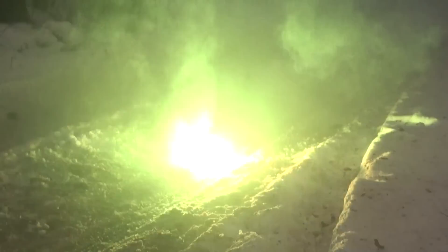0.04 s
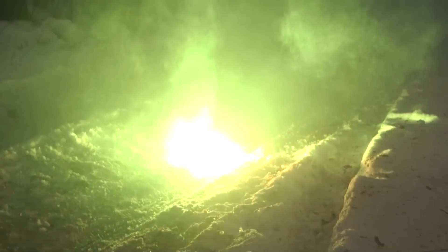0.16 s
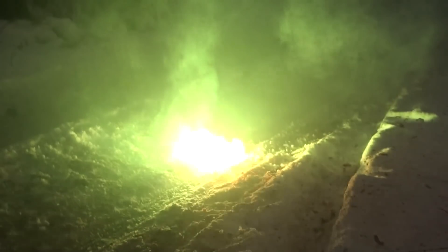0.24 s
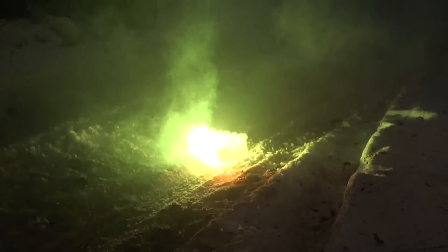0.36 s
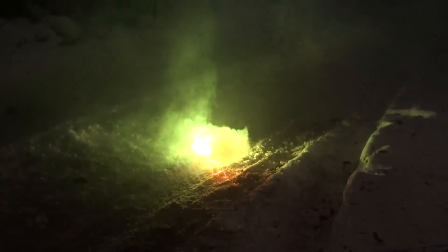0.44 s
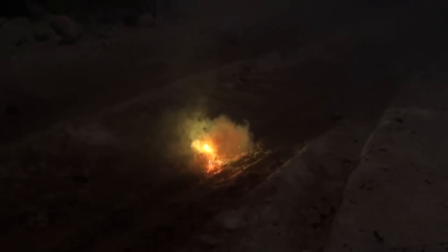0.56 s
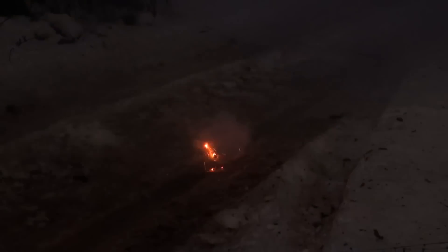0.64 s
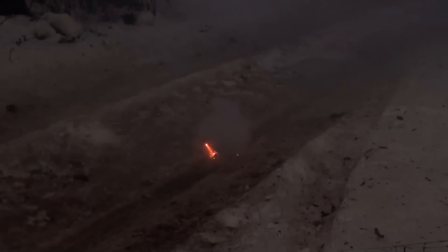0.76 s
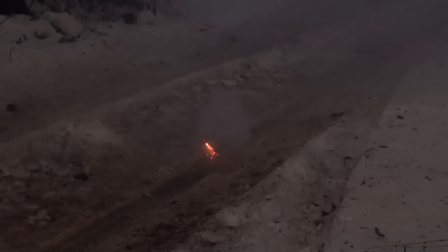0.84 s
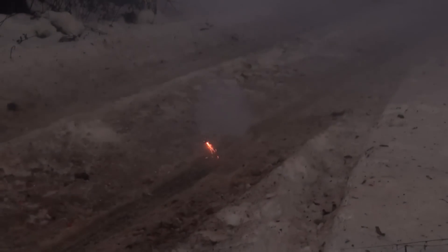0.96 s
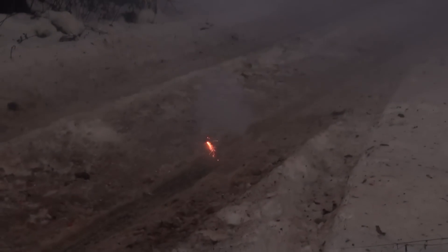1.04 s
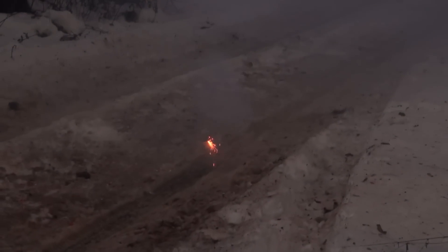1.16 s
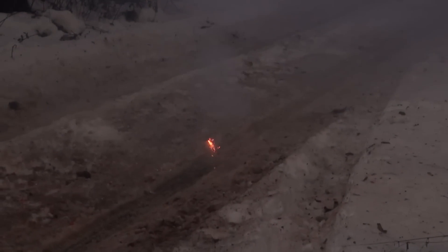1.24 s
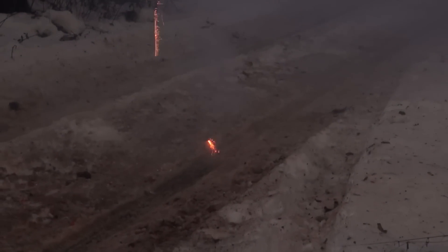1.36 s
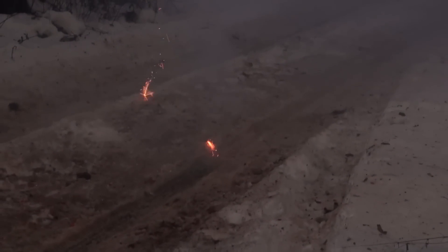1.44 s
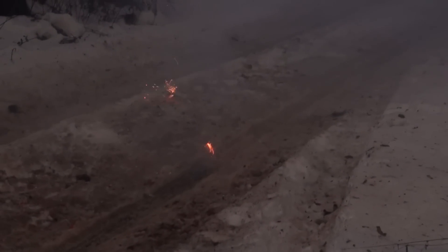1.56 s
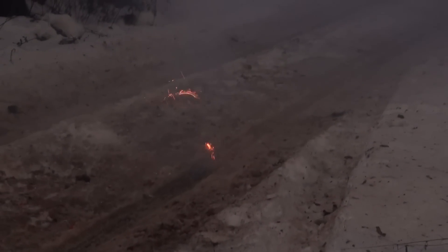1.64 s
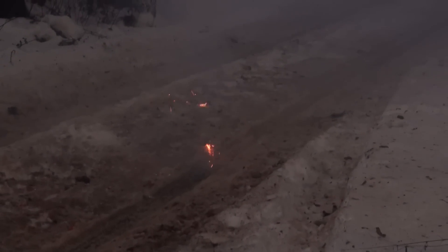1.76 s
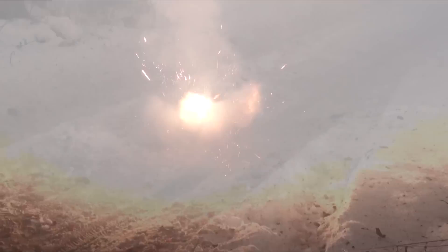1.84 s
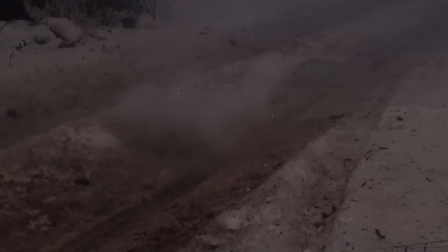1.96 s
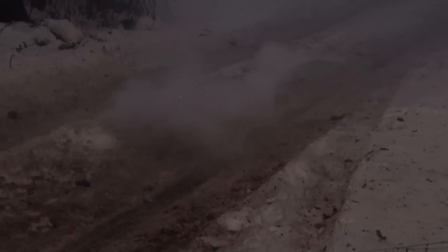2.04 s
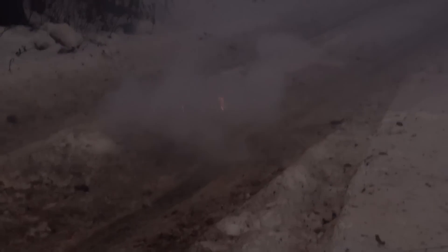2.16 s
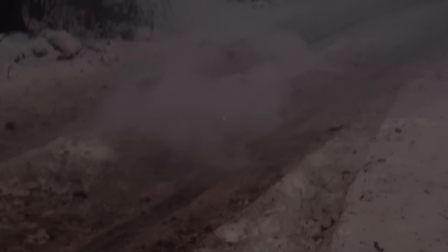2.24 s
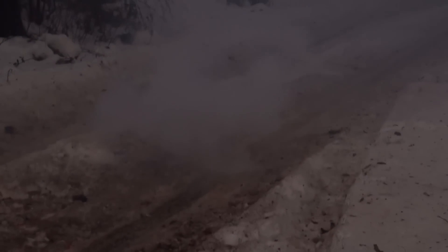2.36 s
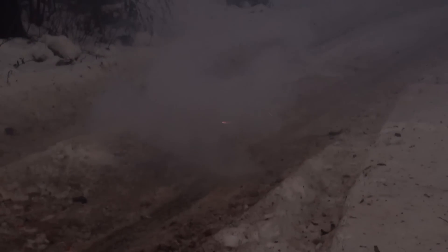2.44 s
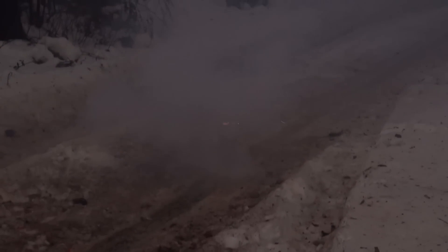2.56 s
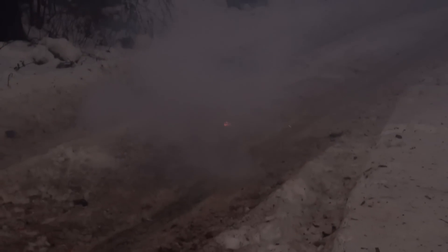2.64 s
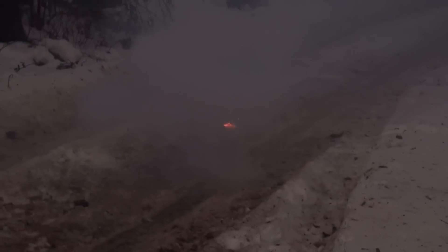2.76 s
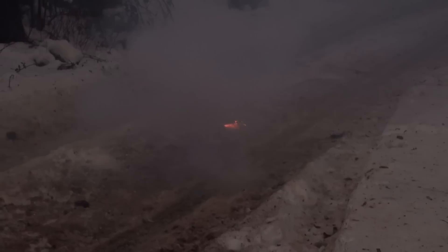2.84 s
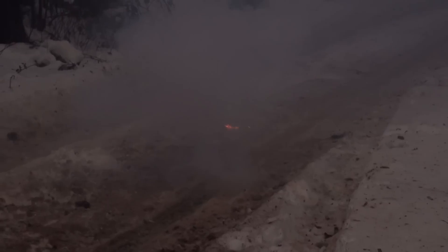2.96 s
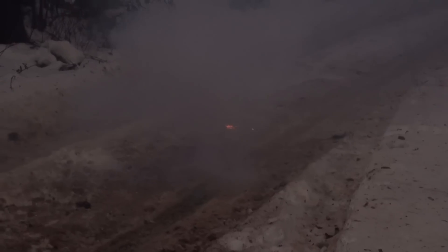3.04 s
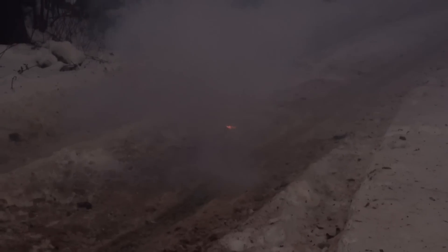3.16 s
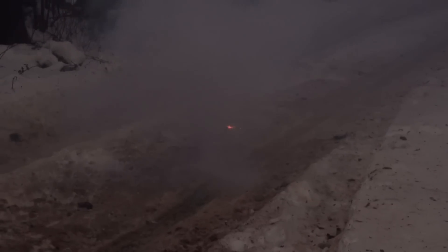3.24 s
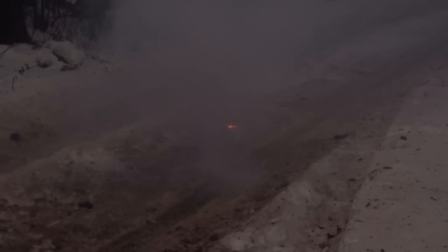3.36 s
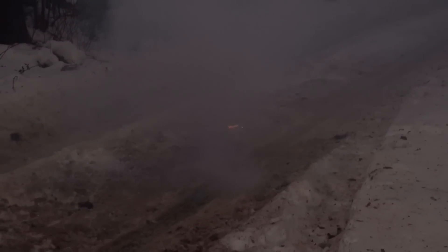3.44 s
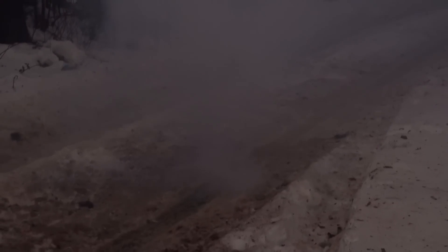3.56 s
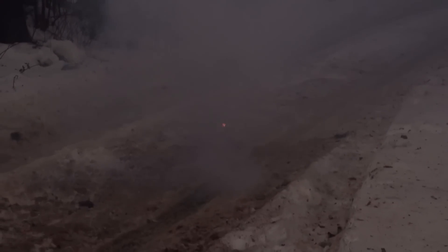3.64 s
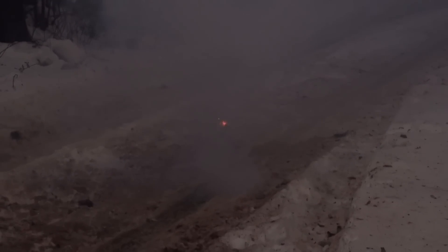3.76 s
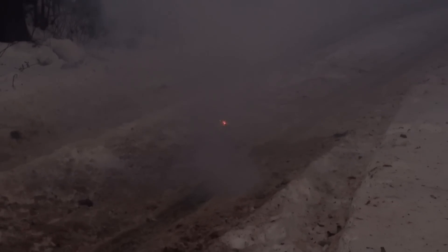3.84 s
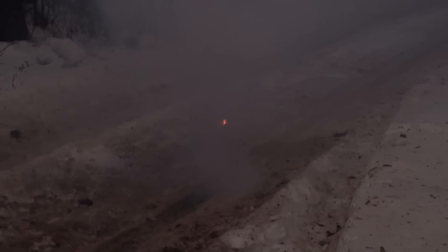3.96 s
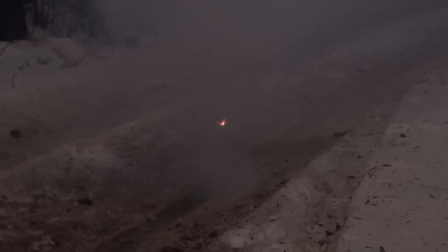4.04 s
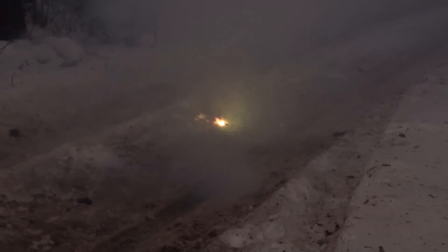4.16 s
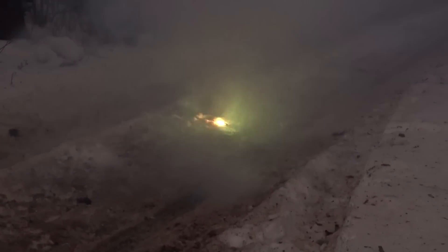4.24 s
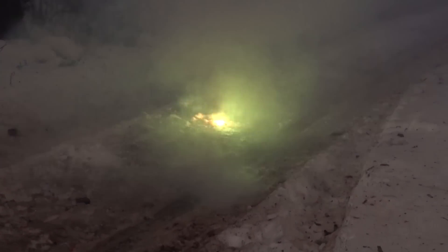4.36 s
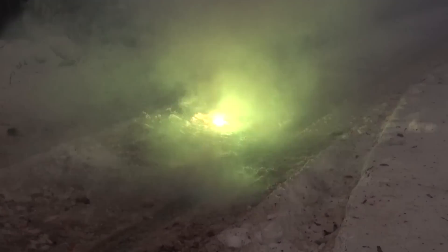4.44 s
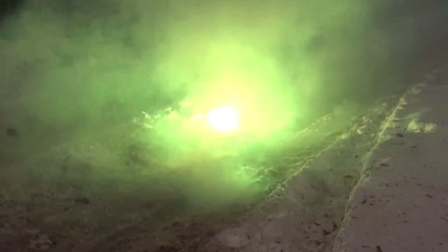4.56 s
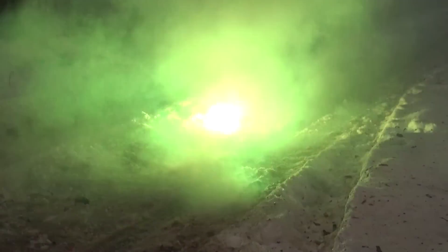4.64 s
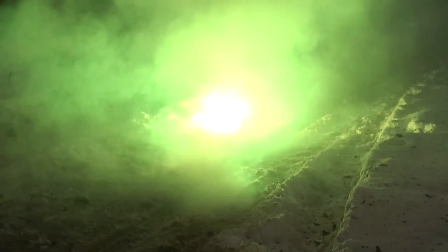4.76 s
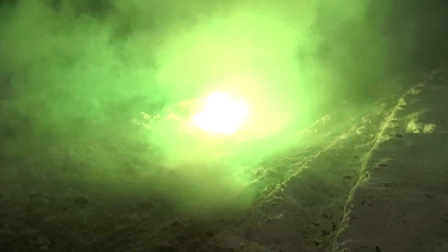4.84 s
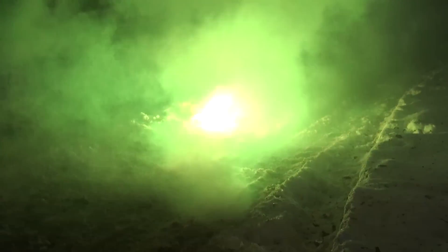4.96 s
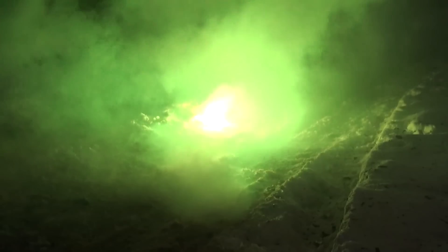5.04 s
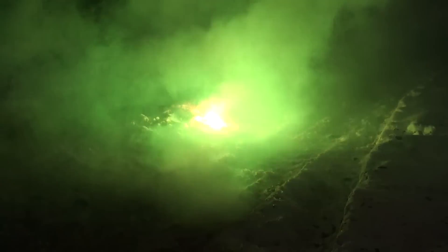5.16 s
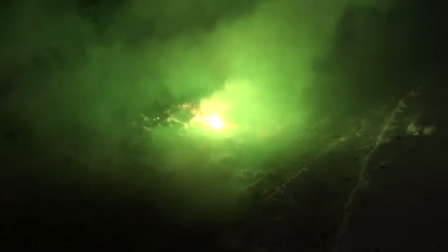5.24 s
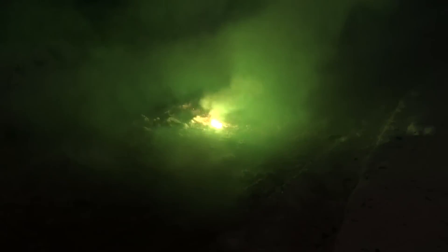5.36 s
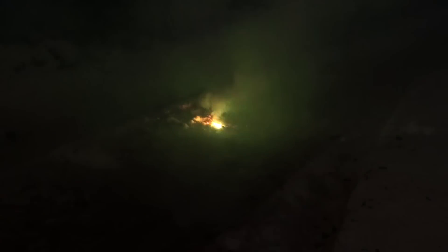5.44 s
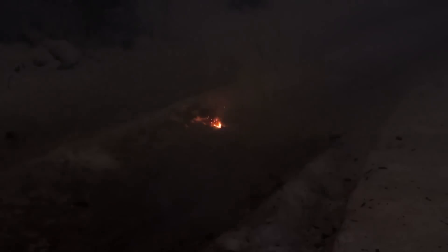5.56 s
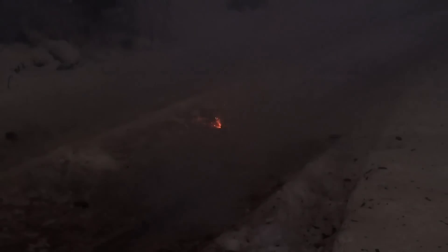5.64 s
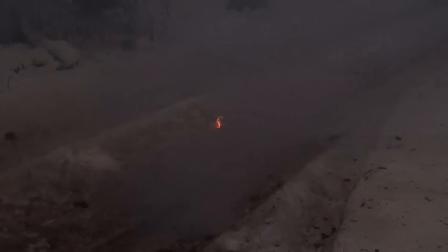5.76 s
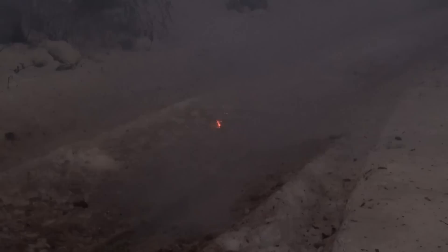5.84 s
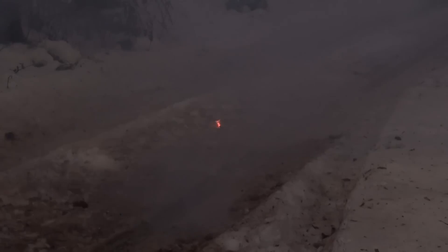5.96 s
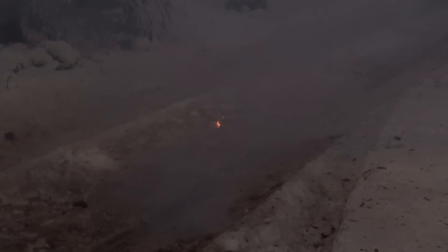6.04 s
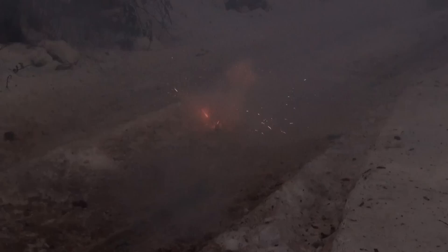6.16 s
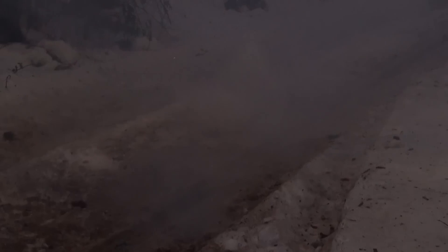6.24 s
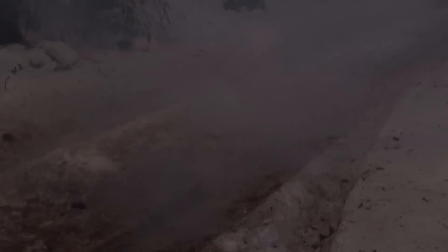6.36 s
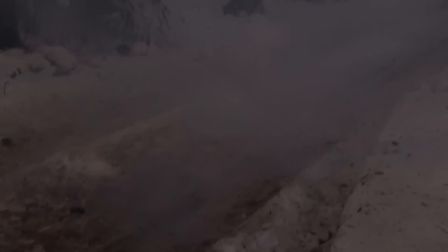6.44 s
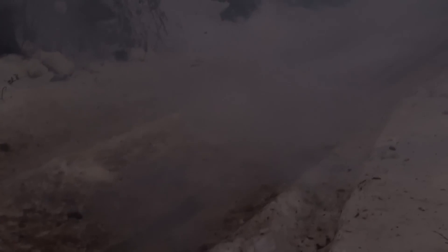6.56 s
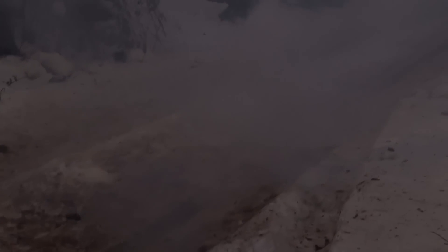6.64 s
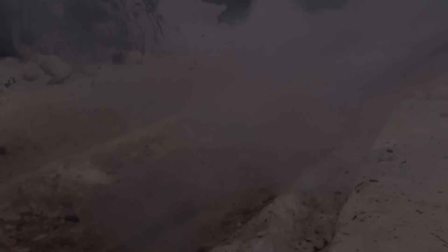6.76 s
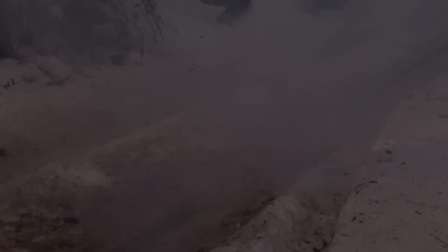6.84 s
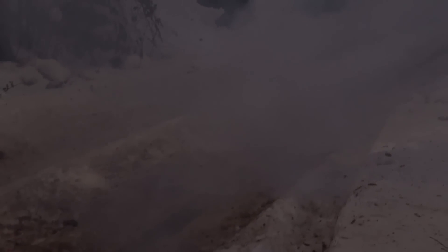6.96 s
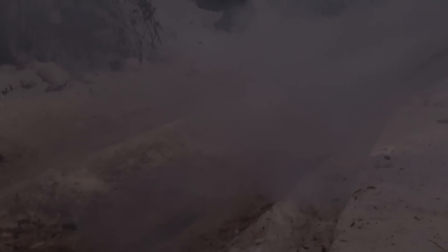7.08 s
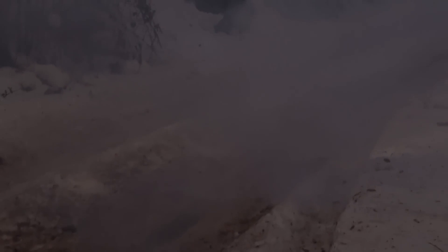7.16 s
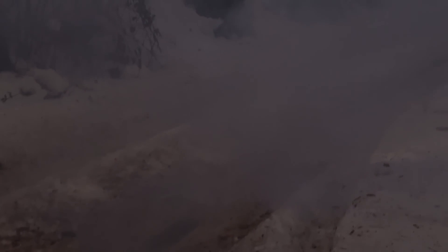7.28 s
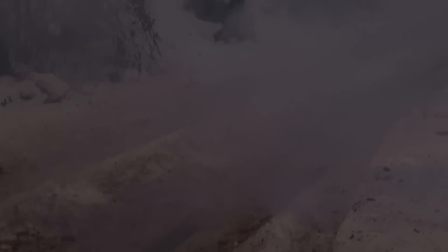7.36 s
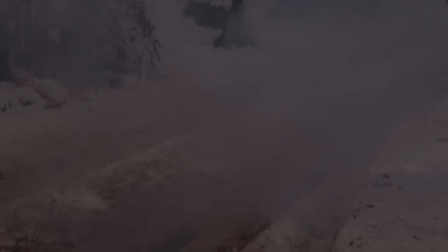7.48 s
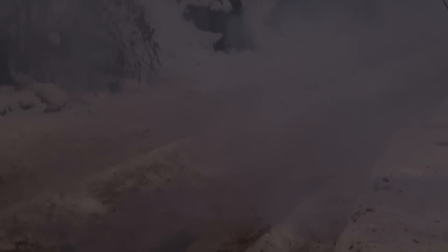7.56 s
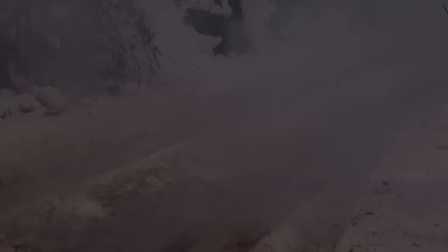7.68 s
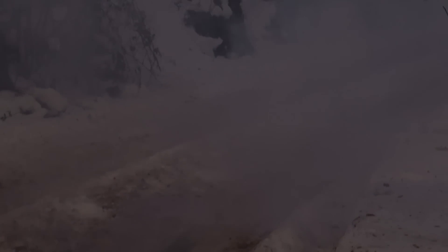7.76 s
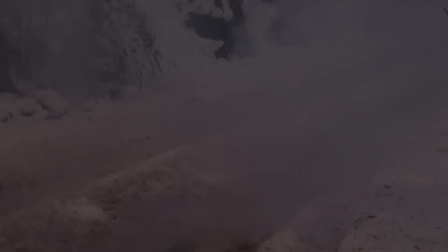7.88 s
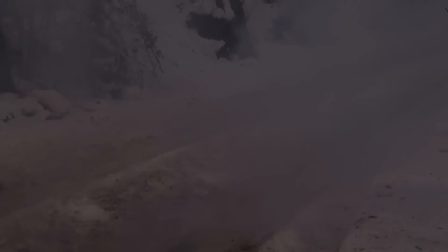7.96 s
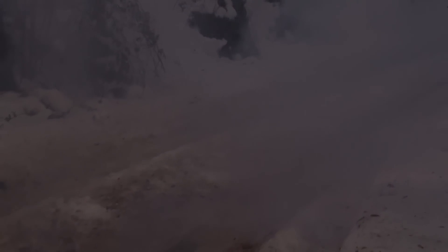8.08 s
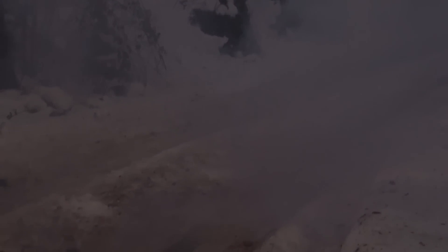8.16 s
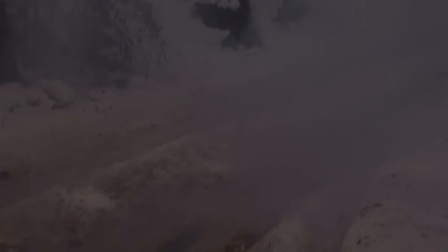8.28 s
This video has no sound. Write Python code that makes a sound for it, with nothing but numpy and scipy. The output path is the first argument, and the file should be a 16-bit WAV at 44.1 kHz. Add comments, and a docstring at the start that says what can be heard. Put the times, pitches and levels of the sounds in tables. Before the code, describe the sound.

At 0 s a faint hiss quickly swells into a bright, fierce sizzle with a rushing plume and low fluttering flame, strongest around 0.2-0.6 s. It weakens to an uneven sputter with gas spurts near 0.95 and 1.2 s; a spark tick and dull far thuds come at 1.5-1.9 s. At 1.93 s a close, overloaded bang hits: sharp crack, deep boom, slaps until about 2.6 s, and a roll growing duller. Faint fuse fizz and tiny ticks remain around 2.3-3.9 s, with soft thuds near 3.8 and 4.1 s. From about 4.2 s a quieter rushing, fluttering flare swells, peaks near 4.9-5.3 s and fades to weak hiss. At 6.23 s a second bang arrives, slightly slower in onset, with slaps to 6.6 s and a long echo. Low rumble and microphone hiss remain, with muffled distant pops around 8.0-8.2 s. Sound leans right throughout.

```python
"""Two firecrackers on a snowy street at night: each hisses and flutters as a green flare, then bursts.
Flares and fuse are coloured noise grains under burn envelopes; each burst is a pressure wave and a crack.
The blast rolls back from houses and trees as grains, swells and slaps, duller the further it has come.
Far thuds, mostly other fireworks, are single swings with soft tails, over a low rumble of noise.
The stereo microphone hisses, its left port is weaker, and the blasts overload the recorder."""
import sys
import numpy as np
from scipy import signal
from scipy.fft import rfft, irfft, next_fast_len
from scipy.io import wavfile
from scipy.ndimage import uniform_filter1d

SR = 44100
rng = np.random.default_rng(int(sys.argv[2]) if len(sys.argv) > 2 else 0)


def to_wav(s):
    """Save 16-bit WAV."""
    ch = np.atleast_2d(s).T  # columns
    pcm = np.round(np.clip(ch, -1, 1) * 32767)  # PCM
    wavfile.write(sys.argv[1], SR, pcm.astype(np.int16))


N = 366559
TIME = np.arange(N) / SR


def undb(db):
    """Decibels to amplitude gain."""
    return np.exp(np.asarray(db) * np.log(10) / 20)


def curve(rows):
    """The second column of a table, joined by straight lines in time."""
    t, values = np.array(rows).T
    return np.interp(TIME, t, values)


def during(rows, fade):
    """One inside the time span of a table, fading to zero over fade seconds outside it."""
    inside = np.minimum(TIME - rows[0][0], rows[-1][0] - TIME)
    return np.clip(1 + inside / fade, 0, 1)


def pan(db):
    """Left and right gains that average 1; a negative level difference leans to the right."""
    half_db = np.atleast_1d(db) / 2
    gains = np.array([undb(half_db), undb(-half_db)])
    return gains / gains.mean(axis=0)


def walk(rate):
    """Slow chance: random levels held 1 / rate s, then smoothed twice."""
    hold = max(int(SR / rate), 1)
    steps = np.repeat(rng.standard_normal(N // hold + 1), hold)
    slewed = uniform_filter1d(steps, hold)
    return uniform_filter1d(slewed, hold)[:N]


def grains(count, spread_db, likeness):
    """About count pulses a second, of uneven size, at two ports; a share of their power is common."""
    total = count * N // SR
    sizes = rng.standard_normal((3, total)) * undb(spread_db * rng.standard_normal((3, total)))
    pulses = np.array([np.bincount(rng.integers(0, N, total), row, N) for row in sizes])
    common, separate = pulses[2], pulses[:2]
    return np.sqrt(likeness) * common + np.sqrt(1 - likeness) * separate


def colour(x, points):
    """Filter a stereo sound to a spectrum; the mean of its two ports has rms 1."""
    size = next_fast_len(N, True)
    hz, db = np.transpose(points)
    log_hz = np.log(np.arange(size // 2 + 1) * SR / size + 1)  # 1 Hz added to avoid log(0)
    gain = undb(np.interp(log_hz, np.log(hz), db))
    y = irfft(rfft(x, size) * gain, size)[:, :N]
    return y / y.mean(axis=0).std()


def add(out, s, sound):
    """Mix a sound in from time s."""
    start = int(s * SR)
    out[:, start:start + sound.shape[-1]] += sound[..., :N - start]


def burn(s, rise, hold, fall, db):
    """Attack up to time s, hold, release; rise and fall are the times for 20 dB."""
    before = np.maximum(s - TIME, 0)
    after = np.maximum(TIME - s - hold, 0)
    return undb(db - 20 * (before / rise + after / fall))


def puff(age, build_up):
    """A swell that peaks at 1 after its build-up time and dies away more slowly."""
    u = np.maximum(age, 0) / build_up
    return u * np.exp(1 - u)


def together(envelopes):
    """Unrelated sounds add in power."""
    return np.sqrt(sum(e ** 2 for e in envelopes))


def pressure_wave(hz, cycles):
    """A push and a suction that swing out within a few cycles; peak 1."""
    turns = hz * TIME[:SR // 8]
    wave = np.sin(2 * np.pi * turns) * turns * np.exp(-turns / cycles)
    return wave / np.abs(wave).max()


# noise spectrum of the microphone: f/Hz, relative level per Hz/dB
HISS_SPECTRUM = [(100, -3), (2000, 8.5), (5000, -6.5), (7500, -7.5), (10000, -8.5), (11500, -13.5),
                 (14000, -21.5)]


def microphone_hiss():
    """Faint steady noise of the microphone, independent at its two ports."""
    return colour(rng.standard_normal((2, N)), HISS_SPECTRUM) * undb(-64)


# spectrum of the low rumble: f/Hz, relative level per Hz/dB
RUMBLE_SPECTRUM = [(25, -4), (60, -2.5), (120, -6), (240, -0.5), (480, -5.5), (900, -10), (1600, -16.5),
                   (3000, -40), (6000, -45), (14000, -57)]
# its two broad swells, the second probably the flare's plume:
# full at t/s, rise for 20 dB/s, hold/s, fall for 20 dB/s, level/dB
RUMBLE_SWELLS = [(1.4, 0.67, .42, .25, -48), (4.38, 0.93, 0.68, 1.9, -47)]


def low_rumble():
    """Low, irregular noise of the far town with two broad swells, the second probably the flare's plume."""
    steady = undb(-53)
    swells = together([steady] + [burn(*swell) for swell in RUMBLE_SWELLS])
    rumble = colour(grains(count=3000, spread_db=3.0, likeness=0.44), RUMBLE_SPECTRUM)
    return rumble * swells * undb(walk(12)) * pan(-11.5)


# spectrum of the hot plume: f/Hz, relative level per Hz/dB
PLUME_SPECTRUM = [(100, -17), (250, -13), (430, -2.5), (700, -9.5), (1200, -15.5), (2200, -18.5),
                  (3500, -28), (8000, -46.5)]
# hot plumes of the two flares: fully alight at t/s, rise for 20 dB/s, hold/s, fall for 20 dB/s, level/dB
PLUME_BURNS = [(0.132, 0.28, 0.12, 0.76, -37.5), (4.85, 0.64, 0.24, 1, -46)]
# spectrum of the low flame: f/Hz, relative level per Hz/dB
FLAME_SPECTRUM = [(25, -29.5), (55, -16), (85, 2.5), (110, -3), (160, -7.5), (300, -13.5), (800, -32),
                  (4000, -65.5)]
# low flames of the two flares: fully alight at t/s, rise for 20 dB/s, hold/s, fall for 20 dB/s, level/dB
FLAME_BURNS = [(0.128, .2, 0.25, 0.59, -41), (4.847, 0.25, 0.29, 0.71, -44.5)]
# spectra of the two gas jets, one list each: f/Hz, relative level per Hz/dB
JET_SPECTRA = [
    [(400, -17.5), (900, -9), (1500, -5.5), (3000, -4), (4800, -1), (6900, -4), (8600, 0), (9700, -7),
     (11400, -15.5), (13400, -21), (14000, -27.5)],
    [(400, -8.5), (1100, -8), (1650, -11), (2400, -5), (3600, -8.5), (5100, -8), (6200, -12), (8000, -9),
     (10000, -16.5), (11500, -22.5), (13200, -23.5), (14000, -32)],
]
# the two gas jets: full force at t/s, rise for 20 dB/s, hold/s, fall for 20 dB/s, level/dB
JET_BURNS = [(0.27, 0.22, 0.29, 0.2, -35), (4.93, 1.17, 0.47, 0.77, -47)]
# each spent flare hissing on until its burst: t/s, level/dB, fading/(dB per s)
AFTERBURNS = [(.73, -40, 5.5), (5.9, -51.5, 0.5)]
# a brief swell at the very start, then spurts of gas as the powder burns unevenly: t/s, build-up/s, level/dB
START_AND_SPURTS = [(0, 0.02, -50.5), (.155, .03, -40), (.242, 0.012, -33.5), (.385, 0.012, -35.5),
                    (.945, .025, -44), (1.18, 0.03, -40.5), (1.6, .016, -46)]
# thin top hiss of a fierce jet: f/Hz, relative level per Hz/dB
SEAR_SPECTRUM = [(4000, -29), (8000, -7.5), (10000, 4), (11500, -7), (13400, -5), (14000, -14)]
AFTERBURN_RISE_S = 0.41  # for 20 dB
SEAR_DB, FIERCE_DB = -12.5, -36.5  # top hiss relative to the jet, when the jet's force is FIERCE_DB


def flares():
    """Burning powder: a rushing hot plume, a low fluttering flame and a gas jet that sizzles until the burst."""
    rush = colour(grains(count=6000, spread_db=4.0, likeness=0.59), PLUME_SPECTRUM)
    rush = rush * undb(1.1 * walk(30)) * pan(-11.0)
    roar = colour(grains(count=6000, spread_db=3.0, likeness=0.76), FLAME_SPECTRUM)
    roar = roar * undb(1.6 * walk(22)) * pan(-20.0)
    sear = colour(grains(count=30000, spread_db=2.5, likeness=0.4), SEAR_SPECTRUM)
    sear = sear * undb(SEAR_DB) * pan(-13.0)
    puffs = together(undb(db) * puff(TIME - s, build_up) for s, build_up, db in START_AND_SPURTS)
    out, previous_burst = np.zeros((2, N)), 0
    burns = zip(PLUME_BURNS, FLAME_BURNS, JET_BURNS, AFTERBURNS, JET_SPECTRA, BANGS)
    for plume, flame, jet, (s, db, fading), spectrum, bang in burns:
        afterburn = burn(s, AFTERBURN_RISE_S, 0, 20 / fading, db)
        force = together([burn(*jet), afterburn, puffs])
        # at its fiercest the jet grows brighter and points further to the right
        lean_db = np.interp(force, undb([-42, -34]), [-1.2, -5])
        sizzle = colour(grains(count=30000, spread_db=3.5, likeness=0.55), spectrum) * pan(lean_db)
        sizzle = sizzle + sear * force / undb(FIERCE_DB)
        flutter = undb(0.5 * walk(40) + 1.4 * walk(12))
        sizzle = sizzle * force * flutter
        burst = bang[0]
        alight = (TIME >= previous_burst) & (TIME < burst)
        out += (sizzle + rush * burn(*plume) + roar * burn(*flame)) * alight
        previous_burst = burst
    return out


# far thuds: distant fireworks, and at 3.818 s a late echo of the first burst:
# t/s, peak level/dB, pitch f/Hz, rolling tail level/dB
FAR_THUDS = [(1.469, -32.5, 520, -54), (1.6128, -28.5, 330, -76), (1.617, -28, 800, -67),
             (1.6171, -25, 208, -73), (1.716, -20, 205, -62), (1.920, -15, 262, -39),
             (3.818, -34, 646, -45.5), (4.12, -37, 403, -53), (4.751, -29, 1100, -40.5),
             (5.316, -31.5, 191, -65), (7.972, -40.5, 258, -61), (8.0727, -31.5, 342, -48.5),
             (8.086, -32, 322, -55), (8.162, -34, 380, -71), (8.203, -37.5, 550, -56)]
# spectrum of their rolling tails: f/Hz, relative level per Hz/dB
FAR_ROLL_SPECTRUM = [(40, -12), (250, -3), (650, 5), (1150, 0), (1900, -10.5), (2700, -27), (6000, -34.5)]


def far_thuds():
    """Distant fireworks, and one late echo of the first burst: dull single swings with soft noise tails."""
    out, tails = np.zeros((2, N)), np.zeros((1, N))
    age = TIME[:SR]
    tail = (1 - np.exp(-age / 0.003)) ** 2 * np.exp(-age / 0.06)
    for s, db, hz, tail_db in FAR_THUDS:
        # the swing starts with the suction
        add(out, s, -pan(-16.5) * pressure_wave(hz, cycles=0.37) * undb(db))
        add(tails, s, tail * undb(tail_db))
    roll = colour(grains(count=4000, spread_db=1.0, likeness=0.47), FAR_ROLL_SPECTRUM)
    return out + roll * tails * pan(-11.5)


# fuse smouldering between the bursts: t/s, level/dB
FUSE_LEVEL = [(2.3, -64), (2.8, -66), (3.05, -63), (3.2, -65.5), (3.35, -62), (3.6, -61.5), (3.72, -71),
              (3.9, -63.5)]
# sparks spitting: t/s, level/dB
SPARKS = [(1.57, -31.5), (2.7931, -55), (3.0345, -54), (3.484, -54), (7.063, -55), (7.367, -58.5),
          (7.9657, -56)]


def fuse():
    """The fuse fizzes faintly, and sparks spit with a short bright tick: swells of one grainy hiss."""
    fizz = colour(grains(count=14000, spread_db=4.5, likeness=0.31), JET_SPECTRA[0])
    envelope = np.array([undb(curve(FUSE_LEVEL)) * during(FUSE_LEVEL, fade=0.21)])
    for s, db in SPARKS:
        add(envelope, s, undb(db) * np.exp(-TIME[:SR // 20] / 0.0031))
    return fizz * envelope * pan(-2.1)


# house rows and tree lines that each send back a swell, for both bursts: delay t/s, build-up/s, level/dB
REFLECTORS = [(.15, 0.085, -2), (.305, 0.017, -14.5), (.67, 0.021, -14.5), (.93, 0.093, -19),
              (1.45, .11, -23.5), (1.887, 0.073, -24.5)]
# the near houses keep the echo up for a moment, then it drops to a long, quieter roll
NEAR_HOLD_S, NEAR_FALL_DB_PER_S = 0.33, 76
ROLL_DB, ROLL_FALL_DB_PER_S = -3.5, 14.5  # the roll's start, relative to the near echo, and its fading


def street(age):
    """Strength of the echo over time: near houses, the long roll, and swells from single reflectors."""
    near = undb(-NEAR_FALL_DB_PER_S * np.maximum(age - NEAR_HOLD_S, 0))
    roll = undb(ROLL_DB - ROLL_FALL_DB_PER_S * age)
    swells = [undb(db) * puff(age - delay, build_up) for delay, build_up, db in REFLECTORS]
    return together([near, roll] + swells)


def air(x, loss_db, slope, growth):
    """Later echoes have come further, so air and snow have taken more of their treble."""
    hz, age, frames = signal.stft(x, SR, nperseg=256)
    loss = loss_db * (hz[:, None] / 1000) ** slope * age ** growth  # loss_db is at 1 kHz after 1 s
    return signal.istft(frames * undb(-loss), SR)[1][:, :x.shape[-1]]


# the two close bursts: t/s, crack level/dB, rise/s, crack decay by 60 dB/s, pressure wave level/dB,
# pressure wave f/Hz, deep boom level/dB, echo level/dB, treble of the echoes relative level/dB
BANGS = [(1.928, -10.5, 0.00082, 0.39, -10, 100.5, -22.5, -18.5, 3.5),
         (6.2279, -11.5, 0.017, 0.23, -16.5, 150, -25, -20, 2.5)]
# spectrum of the close crack: f/Hz, relative level per Hz/dB
CRACK_SPECTRUM = [(25, -14.5), (60, -7.5), (130, 6), (350, -3.5), (800, -1.5), (1500, -9), (2800, -11),
                  (5500, -14), (8500, -22.5), (11500, -25.5), (14000, -32)]
# spectrum of the echoes: f/Hz, relative level per Hz/dB
ECHO_SPECTRUM = [(25, -18), (45, -15.5), (90, -15.5), (135, -6), (180, -1), (330, 0), (480, -2),
                 (700, -5.5), (1400, -9.5), (2800, -11.5), (5500, -13), (8500, -12), (10500, -13),
                 (12000, -28)]
# the deep boom and its returns from rows of houses, for both bursts: delay t/s, relative level/dB
BOOMS = [(.005, -1.5), (.06, -5), (.09, -2), (0.223, -3), (.61, -19), (.67, -20), (.895, -21.5)]
BOOM_HZ = 50
# low boom of the first burst at 1.933 s, then single slaps from walls: t/s, peak level/dB, pitch f/Hz
LOW_BOOM_AND_SLAPS = [(1.933, -16, 68.6), (1.951, -6.5, 165), (1.973, -12, 187), (2.078, -10.5, 265),
                      (2.142, -14.5, 256), (2.243, -9, 484), (2.255, -8, 255), (2.295, -11.5, 320),
                      (2.46, -22, 770), (2.625, -36, 335), (6.294, -25, 186), (6.339, -15, 183),
                      (6.371, -23.5, 100), (6.405, -10, 690), (6.447, -13, 420), (6.521, -13, 610),
                      (6.598, -14.5, 700), (6.903, -32, 250)]


def bangs():
    """Each burst: a pressure wave, a bright crack scattered close by, then booms, slaps and a long roll."""
    out = np.zeros((2, N))
    crack = colour(grains(count=16000, spread_db=4.5, likeness=0.42), CRACK_SPECTRUM) * pan(-2)
    roll = colour(grains(count=12000, spread_db=2.0, likeness=0.34), ECHO_SPECTRUM)
    roll = roll * undb(0.57 * walk(45))
    highpass = signal.butter(1, 2000, "high", fs=SR, output="sos")
    treble = signal.sosfilt(highpass, roll)
    body = (roll - treble) * undb(1.2 * walk(30))
    for s, crack_db, rise, t60, wave_db, wave_hz, boom_db, echo_db, treble_db in BANGS:
        start = int(s * SR)
        age = TIME[:N - start]
        attack = np.minimum(age / rise, 1) ** 2
        add(out, s, crack[:, start:] * attack * undb(crack_db - 60 * age / t60))
        # the slow pressure wave follows the sharp front
        add(out, s + rise / 2, pan(-13.5) * pressure_wave(wave_hz, cycles=0.44) * undb(wave_db))
        for delay, db in BOOMS:
            add(out, s + delay, pan(-14.0) * pressure_wave(BOOM_HZ, cycles=0.31) * undb(boom_db + db))
        # the body of the late echoes leans further to the right
        lean_db = np.interp(age, [0, 0.5, 0.9], [-10.5, -10.5, -15])
        returning = body[:, start:] * pan(lean_db) + treble[:, start:] * undb(treble_db) * pan(-8.5)
        build_up = attack * (1 - np.exp(-age / 0.006))
        returning = returning * undb(echo_db) * street(age) * build_up
        add(out, s, air(returning, loss_db=2.5, slope=1.5, growth=0.8))
    for s, db, hz in LOW_BOOM_AND_SLAPS:
        add(out, s, pan(-14.0) * pressure_wave(hz, cycles=0.7) * undb(db))
    return out


def scene():
    """The snowy street, near and far, with the hiss of the microphone."""
    return microphone_hiss() + low_rumble() + flares() + far_thuds() + fuse() + bangs()


# the right port hears the street a little later: f/Hz, phase lag/rad
PORT_LAG = [(0, 0), (500, .45), (2000, 0.67), (4000, 0.33), (6500, 0.75), (9200, 0)]
TOP_HZ = 14200


def record(dry):
    """Sound reaches the right port a little later; the recorder rounds the highest peaks and cuts the top."""
    size = next_fast_len(N + SR // 10, True)
    hz = np.arange(size // 2 + 1) * SR / size
    lag = np.interp(hz, *np.transpose(PORT_LAG))
    right = irfft(rfft(dry[1], size) * np.exp(-1j * lag), size)[:N]
    ports = np.array([dry[0], right])
    rounded = ports / (1 + ports ** 8) ** (1 / 8)
    lowpass = signal.ellip(10, 0.2, 70, TOP_HZ, fs=SR, output="sos")
    return signal.sosfilt(lowpass, rounded)


dry = scene()
out = record(dry)
to_wav(out)
```